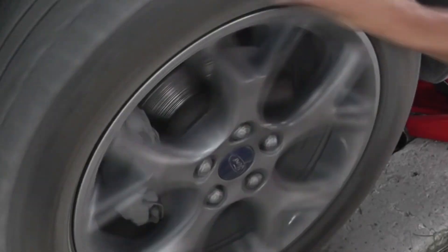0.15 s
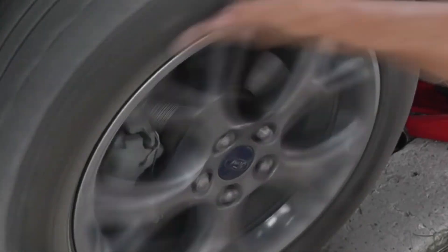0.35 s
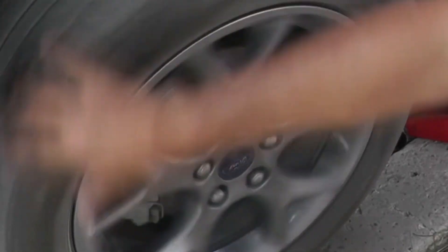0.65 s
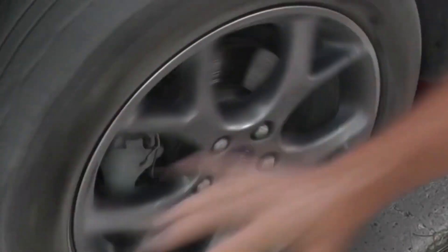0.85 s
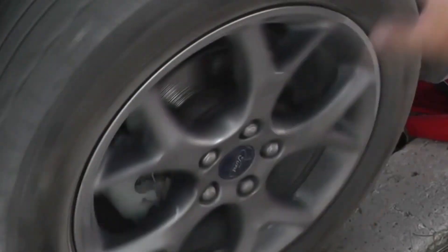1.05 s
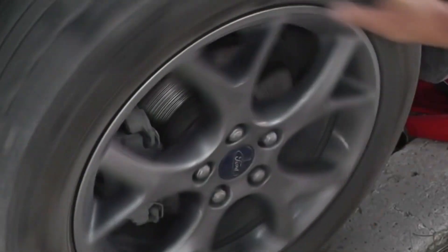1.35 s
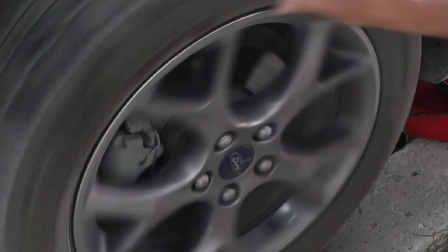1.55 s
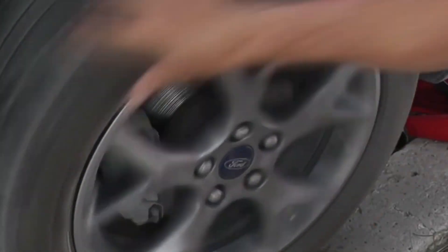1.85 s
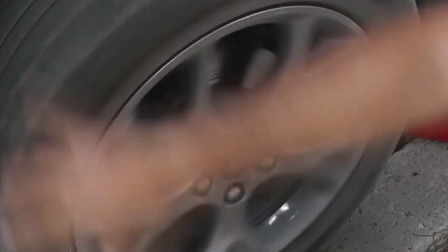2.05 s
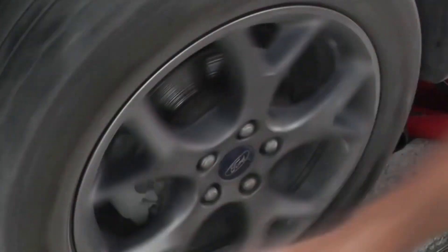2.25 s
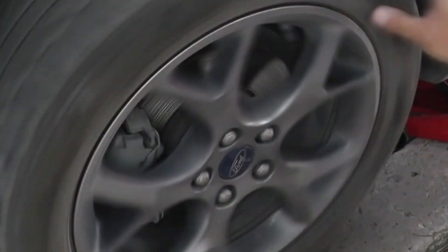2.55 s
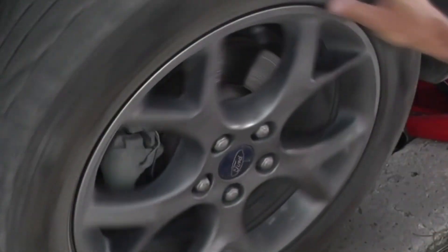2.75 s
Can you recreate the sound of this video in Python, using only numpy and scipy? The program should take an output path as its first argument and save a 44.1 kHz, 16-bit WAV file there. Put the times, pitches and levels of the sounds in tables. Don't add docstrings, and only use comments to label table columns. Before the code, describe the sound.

Worn pads rub a brake disc, squealing in uneven bursts that pause midway, return and fade near the end, while metal hisses and rings and the tyre rumbles with soft hand pushes; close, dry, slightly lo-fi pickup.

```python
import sys
import numpy as np
from scipy import signal
from scipy.fft import rfft, irfft
from scipy.io import wavfile
from scipy.ndimage import uniform_filter1d

SR = 44100
rng = np.random.default_rng(int(sys.argv[2]) if len(sys.argv) > 2 else 0)


def volts_from_decibels(level):
    exponent = np.asarray(level, float) / 20
    return 10 ** exponent


def store_wav(level_fs):
    pcm = np.round(np.clip(np.atleast_2d(level_fs), -1, 1) * 32767)
    wavfile.write(sys.argv[1], SR, pcm.T.astype(np.int16))


N = 127890


def evened(x):
    return x / np.sqrt(np.mean(x ** 2) + 1e-20)


def curve(points):
    return np.interp(np.arange(N) / SR, *np.transpose(points))


def slow(top_hz):
    hz = np.fft.rfftfreq(N, 1 / SR)
    low_pass = np.exp(-(hz / top_hz) ** 2) * (hz > 0)
    return evened(irfft(rfft(rng.standard_normal(N)) * low_pass, N))


def coloured(shape, patchy_db):
    frames, hz = N // 128 + 5, np.fft.rfftfreq(512, 1 / SR)
    real, imaginary, patches = rng.standard_normal((frames, 257, 3)).T
    patches = uniform_filter1d(patches, size=4, axis=0)
    patches = evened(uniform_filter1d(patches, size=24, axis=1))
    shape_hz, shape_db = np.transpose(shape)
    level_db = np.interp(np.log(hz + 1), np.log(shape_hz), shape_db, right=-90)
    z = (real + 1j * imaginary) * volts_from_decibels(level_db[:, None] + patchy_db * patches)
    return evened(signal.istft(z, nperseg=512, noverlap=384)[1][:N])


def ring(x, hz, width):
    r = np.exp(-np.pi * width / SR)
    return evened(signal.lfilter([1, 0, -1], [1, -2 * r * np.cos(2 * np.pi * hz / SR), r * r], x))


def squeal(hz, rough):
    wandering_hz = hz + 3.5 * slow(top_hz=20)
    tremble = 1j * slow(top_hz=40) + .1 * slow(top_hz=35)
    return np.exp(2j * np.pi * np.cumsum(wandering_hz) / SR + rough * tremble)


def swells(grabs, thread_db):
    t = np.arange(N) / SR
    thread = volts_from_decibels(thread_db + 0.98 * slow(top_hz=9.4))
    power = thread ** 2
    for centre_s, length_s, level_db in grabs:
        swell = np.exp(-abs((t - centre_s) / (.5 * length_s)) ** 2.8)
        power = power + volts_from_decibels(2 * level_db) * swell
    return np.sqrt(2 * power)


def squeals():
    # centre_s, length_s, level_db
    high_grabs = [(-0.004, 0.032, -40), (0.126, 0.076, -40), (0.245, 0.041, -37), (0.299, 0.025, -44),
                  (0.4, 0.089, -31.5), (0.486, 0.038, -30), (0.558, 0.018, -23.5), (0.586, 0.012, -24),
                  (0.599, 0.154, -28.5), (0.619, 0.032, -24), (0.672, 0.064, -20.5), (0.739, 0.018, -23.5),
                  (0.754, 0.051, -22.0), (0.816, 0.048, -26.5), (0.835, 0.012, -23.5), (0.849, 0.04, -37),
                  (0.907, 0.019, -21), (0.945, 0.107, -23.5), (0.968, 0.036, -25.0), (1.008, 0.023, -24),
                  (1.083, 0.086, -25.5), (1.124, 0.029, -26.5), (1.163, 0.032, -28), (1.222, 0.056, -34),
                  (1.563, 0.014, -39), (1.628, 0.035, -33.5), (1.718, 0.031, -25.5), (1.767, 0.16, -25.5),
                  (1.786, 0.024, -19), (1.875, 0.027, -26.5), (1.907, 0.027, -22.5), (1.952, 0.027, -22),
                  (1.991, 0.015, -23.5), (1.999, 0.069, -31.5), (2.07, 0.037, -20), (2.117, 0.029, -19.0),
                  (2.157, 0.017, -20.5), (2.171, 0.079, -23.5), (2.211, 0.041, -30.5), (2.227, 0.052, -27),
                  (2.239, 0.044, -22.0), (2.247, 0.037, -26), (2.301, 0.015, -34), (2.352, 0.014, -35),
                  (2.38, 0.016, -29), (2.425, 0.02, -29.5), (2.458, 0.015, -30), (2.527, 0.17, -29.5),
                  (2.528, 0.018, -28.5), (2.56, 0.033, -22), (2.676, 0.017, -35.5), (2.742, 0.07, -38)]
    low_grabs = [(0.086, 0.11, -39.5), (0.127, 0.069, -29.0), (0.213, 0.047, -30.5), (0.296, 0.046, -31.5),
                 (0.307, 0.031, -28), (0.363, 0.037, -27.5), (0.371, 0.023, -28.5), (0.374, 0.037, -39),
                 (0.4, 0.022, -21.5), (0.435, 0.043, -21), (0.472, 0.054, -22), (0.492, 0.041, -43),
                 (0.493, 0.026, -29), (0.579, 0.059, -40.0), (0.59, 0.035, -28), (0.61, 0.13, -37.5),
                 (0.634, 0.033, -30.5), (0.73, 0.021, -40.5), (0.78, 0.024, -44), (0.907, 0.058, -51),
                 (0.927, 0.068, -44), (1.05, 0.032, -41), (1.339, 0.063, -32.5), (1.37, 0.1, -34),
                 (1.48, 0.03, -38), (1.52, 0.018, -42.0), (1.59, 0.029, -40), (1.644, 0.022, -35.5),
                 (1.68, 0.011, -38), (1.733, 0.042, -45), (1.734, 0.036, -38.5), (2.346, 0.025, -59),
                 (2.45, 0.013, -53), (2.674, 0.072, -42), (2.747, 0.035, -43), (2.79, 0.025, -41.5),
                 (2.86, 0.04, -40.5)]
    third_grabs = [(0.04, 0.16, -43), (0.137, 0.028, -40), (0.177, 0.035, -36), (0.223, 0.092, -43),
                   (0.33, 0.015, -40), (0.603, 0.042, -38), (0.684, 0.032, -45), (0.762, 0.043, -43),
                   (0.903, 0.039, -45.0), (1.076, 0.048, -46), (1.194, 0.023, -38.5), (1.214, 0.067, -44.5),
                   (1.362, 0.035, -43), (1.47, 0.066, -48), (1.59, 0.023, -42), (1.668, 0.049, -42),
                   (1.892, 0.013, -38), (2.251, 0.07, -50), (2.392, 0.036, -44), (2.472, 0.03, -45.0),
                   (2.814, 0.052, -53), (2.876, 0.03, -44.5)]
    fourth_grabs = [(0.043, 0.19, -50.0), (0.235, 0.11, -42.0), (0.416, 0.051, -46.5), (0.72, 0.025, -46),
                    (0.897, 0.028, -41), (1.119, 0.037, -39), (1.166, 0.012, -41), (1.378, 0.09, -48),
                    (1.473, 0.058, -45), (1.687, 0.035, -44.5), (1.803, 0.02, -58), (2.397, 0.026, -43.5),
                    (2.816, 0.044, -39)]
    threads_db = [
        -50,
        -46.5,
        -50,
        -53,
    ]
    # time_s, pitch_hz
    high_pitch = [(.25, 7147), (.6, 7162), (1.8, 7162), (1.96, 7172), (2.25, 7163), (2.4, 7168),
                  (2.8, 7156)]
    # time_s, change_db
    octave_change = [(.5, 1), (.9, 1), (1.7, -3)]
    rough = .3

    all_grabs = [high_grabs, low_grabs, third_grabs, fourth_grabs]
    high, low, third, fourth = map(swells, all_grabs, threads_db)
    turn = squeal(curve(high_pitch), rough)
    octave = volts_from_decibels(-38 + curve(octave_change)) * turn ** 2
    high = high * (turn + octave)
    low = low * squeal(5111 - 9 * low / low.max(), rough / 2)
    third = third * squeal(5599, rough)
    fourth = fourth * squeal(5787, rough)
    return (high + low + third + fourth).real


def fine_modes(x):
    z, hz = rfft(x), np.fft.rfftfreq(N, 1 / SR)
    t = np.arange(len(z)) / len(z) * N / SR / 2
    smoothing = np.exp(-(t * 36) ** 2) * (t > 0)
    ripple = evened(rfft(rng.standard_normal(len(z)) * smoothing, N).real)
    ripple_db = 2.2 * ripple / (1 + (hz / 7500) ** 4)
    return evened(irfft(z * volts_from_decibels(ripple_db), N))


def scrape():
    # time_s, level_db
    contact = [(0, -55), (.12, -51.5), (.36, -48.5), (.42, -50), (.79, -56), (.86, -48.5), (.97, -56),
               (1.03, -53.5), (1.29, -56.5), (1.36, -51.5), (1.45, -53.5), (1.6, -51.5), (1.9, -49.5),
               (2.24, -53), (2.29, -58), (2.36, -52.5), (2.56, -53.5), (2.75, -56)]
    # pitch_hz, level_db (per Hz)
    hiss = [(300, -45), (900, -35.5), (2200, -23), (4500, -19), (7000, -17), (8600, -23), (11000, -23),
            (15900, -32)]
    # pitch_hz, level_db
    rim_modes = [(403.7, -63), (554.5, -63.5), (802.1, -63), (904.4, -67), (1314, -61), (1610, -59.5),
                 (1733, -65.5), (2121, -65.5), (2353, -69), (2783, -60), (2923, -62.5)]
    disc_modes = [(3451, -70.5), (3731, -60.5), (4064, -59), (4312, -55.5), (4624, -53), (4867, -54)]
    disc_top_modes = [(5529, -56), (5599, -81), (5787, -59.5), (5922, -53), (6363, -54.5), (6767, -52),
                      (6993, -62)]
    clip_modes = [(7520, -63.5), (7983, -71.5), (9480, -67), (10201, -69.5)]
    squeal_modes = [(4710, -63), (6660, -66), (6760, -54), (5180, -57), (2723, -66), (1270, -73),
                    (5270, -59), (5040, -55), (7160, -53)]
    hub_modes = [(660, -63), (1195, -68), (2020, -65), (2980, -64)]
    # gain_db, width_hz, pressure_share (0 to 1)
    ringing = [
        (-0.5, 12.3, 1),
        (1.5, 20.3, 0.97),
        (-1, 34, 0.17),
        (6, 19, 0.8),
        (3.5, 77, 0.57),
        (-1.5, 22, 0.92),
    ]
    # time_s, level_db
    hum = [(.05, -73), (.4, -58), (1.18, -61.5), (1.42, -52.5), (2.16, -67.5), (2.45, -56.5), (2.71, -52.5),
           (2.9, -57)]

    press_db = curve(contact) + 52 + 1.5 * slow(top_hz=42)
    out = volts_from_decibels(-45 + press_db) * fine_modes(coloured(hiss, patchy_db=3.5))
    parts = [rim_modes[1:], disc_modes, disc_top_modes, clip_modes, squeal_modes, hub_modes]
    for modes, (gain_db, width_hz, share) in zip(parts, ringing):
        for hz, mode_db in modes:
            grit = volts_from_decibels(share * press_db) * rng.standard_normal(N)
            out = out + volts_from_decibels(gain_db + mode_db) * ring(grit, hz, width_hz)

    steady = ring(rng.standard_normal(N), hz=408.2, width=7.9)
    strength = np.sqrt(abs(uniform_filter1d(steady ** 2, size=2000)))
    steady = steady / (.5 + strength) * 1.6
    return out + volts_from_decibels(curve(hum)) * steady


def tyre():
    # time_s, level_db
    roll = [(0, -55), (.05, -50.5), (.5, -55.5), (.57, -54.5), (.8, -61), (.86, -53.5), (1.07, -59.5),
            (1.28, -55), (1.38, -50.5), (1.55, -52.5), (1.67, -51.5), (1.8, -53.5), (2.13, -55),
            (2.29, -57), (2.53, -50), (2.7, -57), (2.9, -54)]
    # pitch_hz, level_db (per Hz)
    rumble = [(25, -40), (60, -16), (120, -8), (200, 0), (400, 1.5), (700, -4), (1100, -2.5), (2500, -30)]
    push_colour = [(60, -26), (190, 4.5), (500, -1), (1300, -1), (2500, -12)]
    # start_s, level_db, length_s
    pushes = [
        (0.392, -38, 0.013),
        (0.832, -50, 0.024),
        (1.453, -40, 0.045),
        (2.037, -42, 0.017),
        (2.853, -41, 0.048),
    ]

    t = np.arange(N) / SR
    push = 0
    for start_s, level_db, length_s in pushes:
        rise = np.clip((t - start_s) / 0.016, 0, 1)
        push = push + volts_from_decibels(level_db) * rise * np.exp(-abs(t - start_s) / length_s)
    rolling = volts_from_decibels(curve(roll) + 0.71 * slow(top_hz=7.0)) * coloured(rumble, patchy_db=3.26)
    return rolling + push * coloured(push_colour, patchy_db=1.3)


def hollowed(x):
    # pitch_hz, level_db
    valleys = [(1060, -2), (1440, 0), (1910, -1), (2230, -6), (2480, -4), (2860, -1.5), (4180, 1.5),
               (4960, -7), (5340, -21), (5690, -24), (6170, -6), (6540, -3), (7790, -4)]
    hz = np.fft.rfftfreq(N, 1 / SR)
    valley_db = sum(db * np.exp(-((hz - centre_hz) / 71) ** 2) for centre_hz, db in valleys)
    return irfft(rfft(x) * volts_from_decibels(valley_db), N)


def thuds():
    # centre_s, pitch_hz, level_db, length_s
    wall_thuds = [(.04, 102, -62, .025), (.26, 132, -63.5, 0.023), (.58, 113, -59, .02),
                  (.89, 128, -60.5, 0.022), (1.27, 99, -59.5, 0.035), (1.478, 192, -50, 0.025),
                  (1.66, 191, -54.5, 0.017), (2.52, 138, -64.5, 0.014), (2.79, 58, -64.5, .03),
                  (2.66, 190, -60, 0.017)]
    t = np.arange(N) / SR
    out = 0
    for centre_s, hz, level_db, length_s in wall_thuds:
        swell = np.exp(-((t - centre_s) / length_s) ** 2)
        out = out + volts_from_decibels(level_db) * np.sqrt(2) * swell * np.sin(2 * np.pi * hz * (t - centre_s))
    return out


def scene():
    return (squeals() + hollowed(scrape() + tyre()) + thuds())[None]


def top_cut(x):
    return signal.sosfilt(signal.butter(12, 15690, fs=SR, output="sos"), x)


def record(dry):
    # pitch_hz, threshold (spreads above chance)
    drops = [(6200, -3), (6530, -1.5), (6800, -3.5), (11800, -2), (13000, -.7), (13850, .9), (14350, -2.4),
             (14900, -.7), (15350, .5), (15800, .7)]
    hz, t, z = signal.stft(dry[0], SR, nperseg=1024, noverlap=768)
    chance = rng.standard_normal(z.shape[::-1]).T
    chance = uniform_filter1d(chance, size=5, axis=0)
    chance = evened(uniform_filter1d(chance, size=12, axis=1))
    broad = evened(uniform_filter1d(chance, size=40, axis=0))
    chance = .85 * chance + .5 * broad

    treble_power = (abs(z[hz > 6500]) ** 2).sum(0)
    loud_db = 10 * np.log10(2 * uniform_filter1d(treble_power, size=5) + 1e-12)
    near_squeal = np.exp(-((hz[:, None] - 8500) / 520) ** 2)
    mask = near_squeal * np.maximum(loud_db + 34, 0) * .36
    kept = chance > np.interp(hz, *np.transpose(drops))[:, None] + mask
    mix = signal.istft(z * kept, SR, nperseg=1024, noverlap=768)[1][None, :N]
    return top_cut(mix)


dry = scene()
out = record(dry)
store_wav(out)
```